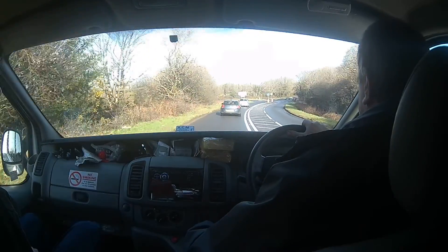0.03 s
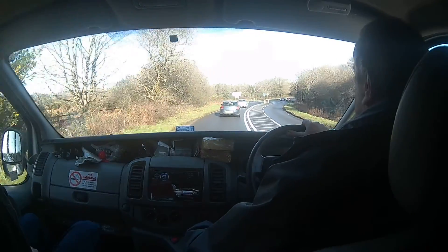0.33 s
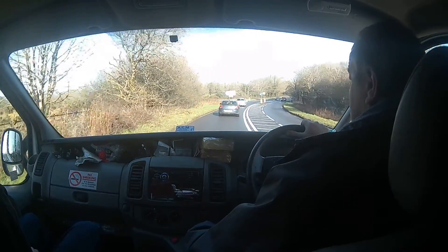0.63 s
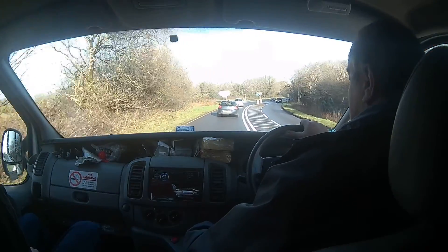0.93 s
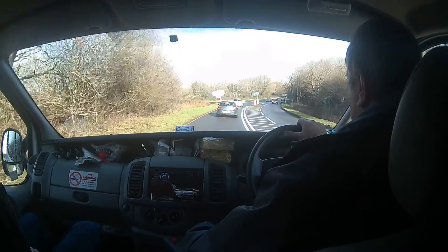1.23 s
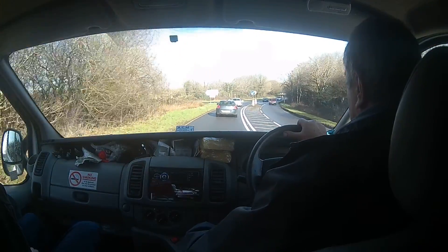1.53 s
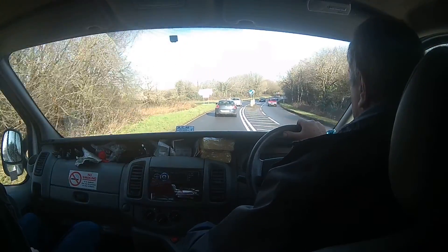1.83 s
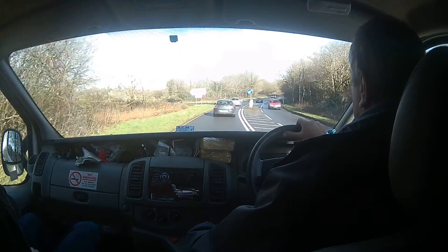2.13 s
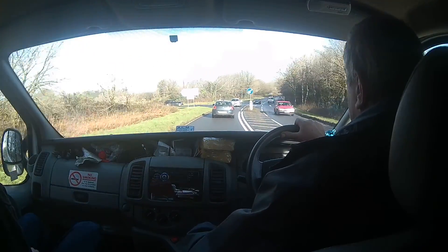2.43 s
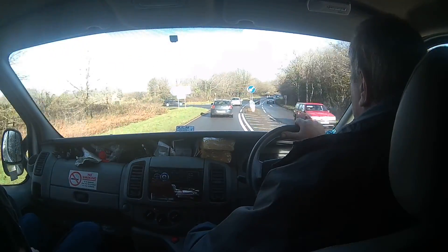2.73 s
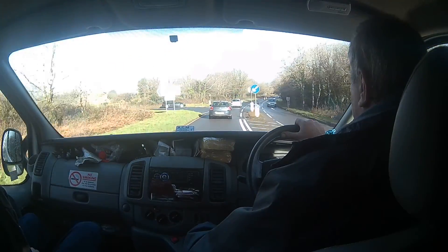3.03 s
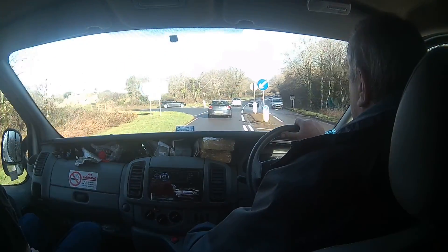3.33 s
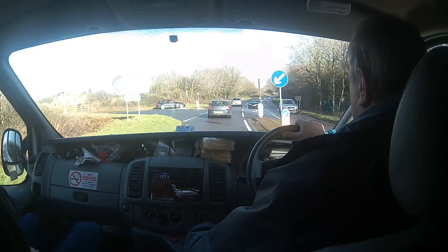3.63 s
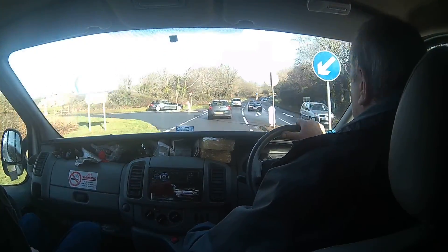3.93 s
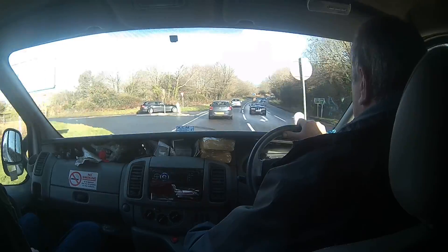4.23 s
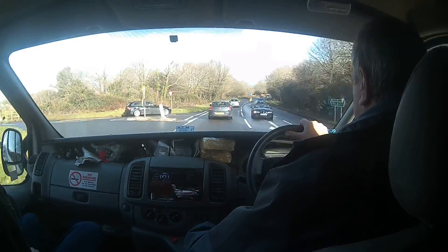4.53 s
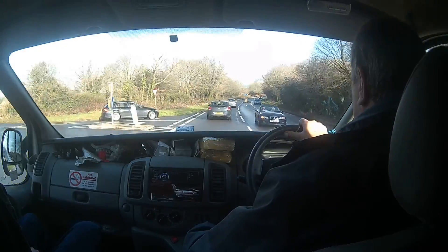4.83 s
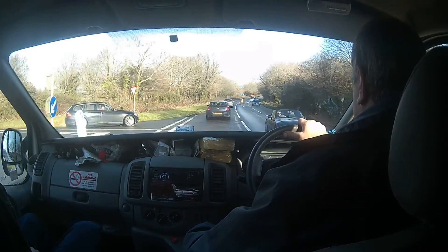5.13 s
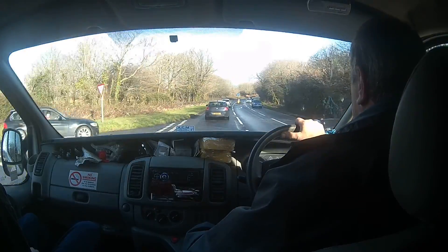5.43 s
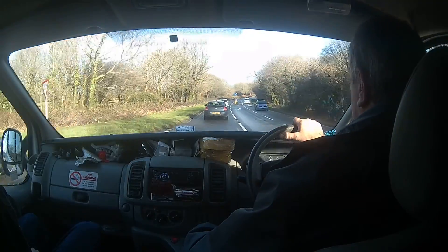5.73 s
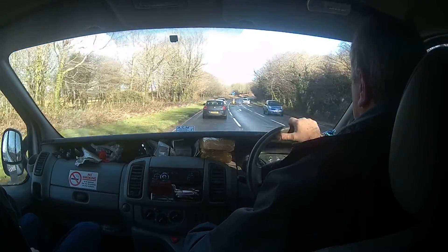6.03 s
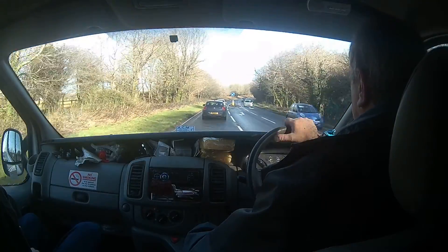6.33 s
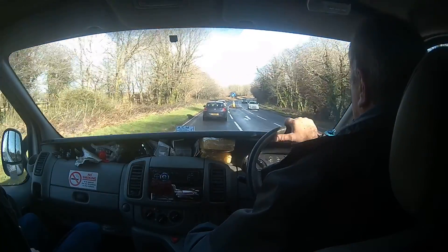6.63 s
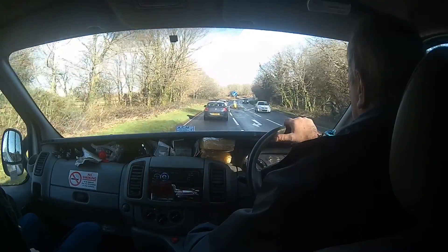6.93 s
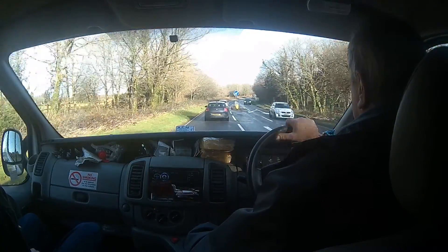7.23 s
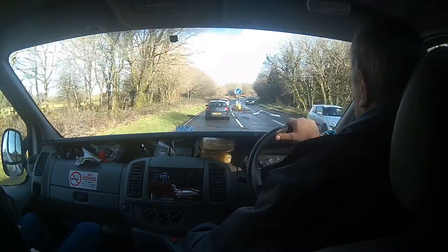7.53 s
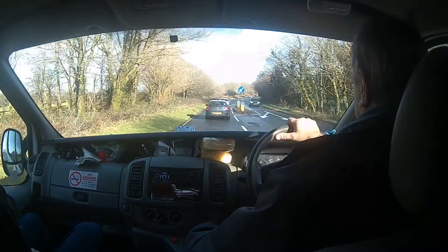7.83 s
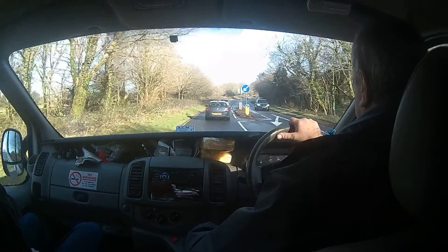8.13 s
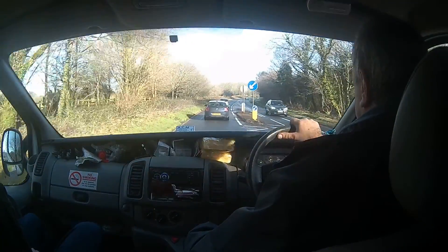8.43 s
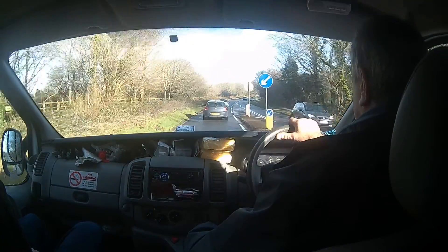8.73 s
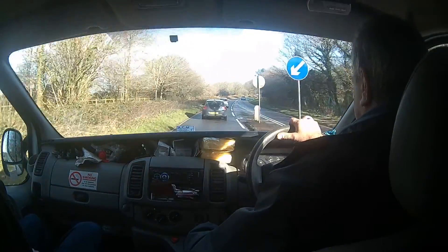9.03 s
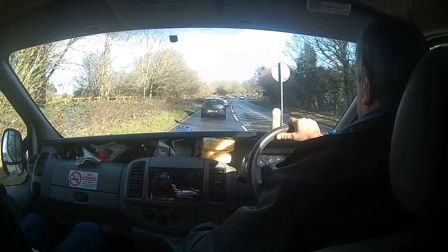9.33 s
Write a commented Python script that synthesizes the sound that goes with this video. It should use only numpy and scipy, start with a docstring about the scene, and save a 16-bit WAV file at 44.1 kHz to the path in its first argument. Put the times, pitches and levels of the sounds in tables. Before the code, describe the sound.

A van drives along a country road, heard from between the seats in the closed cab. From start to end, about nine and a half seconds, tyres roar steadily over a low road boom and a deep engine drone with faint clatter. The engine pitch creeps up very slightly and the floor rumble grows a little. The tyre noise swells briefly on rough asphalt around 1, 4, 6.5 and 7 seconds, and again from 9 seconds. Loose things on the dashboard and plastic trim give short, irregular clacks and knocks throughout, busier around 0.7, 2.5 and 5 seconds. Dull bumps come through the floor at about 1.2 and 3.8 seconds. A soft gear whine swells and fades around 7 seconds. A sharper clack stands out at 8.5 seconds, and the loudest arrives with a thud at 9.4 seconds.

```python
"""Tyre roar and road boom inside the cab of a van slowly gathering speed on a country road.
Tread noise passes through the panels; the road shakes the shell and the cab's lowest air mode.
The engine drones at its firing rate and clatters faintly; a gear whines softly.
Bumps thud in the chassis; plastic trim and loose things on the dashboard rattle."""
import sys
import numpy as np
from scipy import signal
from scipy.fft import rfft, irfft
from scipy.io import wavfile
from scipy.ndimage import uniform_filter1d

SR = 44100
rng = np.random.default_rng(int(sys.argv[2]) if len(sys.argv) > 2 else 0)


def materialize(psi):
    """Save the field psi as 16-bit PCM at rate SR to the path in sys.argv[1].

    A 1-D psi becomes a single channel; in a 2-D psi each row is a channel.
    """
    bounded = np.clip(np.atleast_2d(psi).T, -1, 1)
    quanta = np.round(bounded * 32767).astype(np.int16)
    wavfile.write(sys.argv[1], SR, quanta)


N = 422919
TIME_S = np.arange(N) / SR

# spectral shapes (frequency [Hz], relative level [dB])
TYRE_SPECTRUM = [(150, -32.5), (330, -5.5), (420, -2), (650, -3), (1150, 1), (1600, -1.5), (2100, -1.5),
                 (2850, -5.5), (3150, -14.5), (3550, -22), (4300, -29), (5200, -37.5), (5800, -60),
                 (8000, -83.5)]  # tread noise
PATCH_SPECTRUM = [(150, -21), (400, -2), (600, -3), (850, -10.5), (1100, 6.5), (1300, -1), (1700, -8),
                  (2800, -14), (3600, -36.5), (6000, -73.5)]  # tread on coarse asphalt
BOOM_SPECTRUM = [(8, -44.5), (13, -22), (22, -7.5), (35, -15.5), (50, -9), (62, -2.5), (72, 3.5), (84, -2),
                 (100, -14.5), (130, -26), (300, -75.5)]  # cab air
RUMBLE_SPECTRUM = [(80, -19.5), (130, -12), (180, -4.5), (235, 0.5), (290, -8.5), (400, -10), (550, -9),
                   (1000, -37.5), (3000, -61.5)]  # floor panels
KNOCK_SPECTRUM = [(100, -35.5), (210, -5.5), (320, -4.5), (450, -1.5), (900, 2.5), (1150, -7), (1700, -14),
                  (3000, -37), (6000, -84)]  # trim panel
CLACK_SPECTRUM = [(200, -49.5), (900, -3.5), (1400, -1.5), (1900, 4.5), (2600, -4), (3100, -16.5),
                  (3700, -32.5), (5200, -41), (6000, -61)]  # hard contact
TICK_SPECTRUM = [(500, -36.5), (2000, -13), (2800, 14), (3300, 10), (3700, -9), (4400, -8), (5300, -25),
                 (5900, -48), (12000, -45.5), (15000, -61.5)]  # edge of a loose part
THUD_SPECTRUM = [(50, -8), (140, -20), (205, -2), (250, 0.5), (330, -13.5), (430, 0.5), (700, -24.5),
                 (3000, -72)]  # floor on a bump
HISS_SPECTRUM = [(3000, -13), (6000, -21.5), (6900, -9.5), (8000, -27), (9000, -8), (10200, -2),
                 (12000, -0.5), (14000, -6), (15700, -7.5)]  # microphone
# cab panel and air resonances (centre [Hz], width [Hz], lift [dB])
CAB_MODES = [(222.2, 53, 4.5), (324.5, 50, -6.5), (463, 27, 3), (506, 36, 6.5), (629, 56, -3),
             (795.7, 46, 7.5), (847.4, 56, 6), (1020, 70, 2), (1245, 43, 0), (1337, 38, 7), (1396, 32, 8.5),
             (1464, 62, 7), (1604, 217, 6), (1800, 80, -4.5), (2149, 64, 5), (2285, 30, -4.5),
             (2350, 71, 4), (2730, 55, -5.5), (2800, 210, 4.5), (3280, 120, 0.5), (3730, 190, -2),
             (3860, 110, 2.5), (4340, 130, 2.5), (4630, 120, 0), (5470, 150, 3)]
# coarse asphalt (centre time [s], length [s], level [dB])
COARSE_PATCHES = [(1.13, 0.42, -55.5), (2.613, 0.11, -59.5), (3.85, 0.65, -58), (6.514, 0.27, -55),
                  (7.19, 0.26, -55.5), (9.09, 0.37, -57), (9.5, 0.35, -53.5)]
# engine speed (time [s], firing rate [Hz])
FIRING_RATE = [(0, 69.4), (1.8, 69.43), (3.2, 70.96), (4.2, 70.1), (6.0, 70.82), (7.2, 72.37),
               (9.59, 73.98)]
# low drone (time [s], firing line level [dB], road boom level [dB])
DRONE_LEVELS = [(0, -61, -56.5), (1.2, -59, -56), (1.7, -66, -58.5), (2.7, -59, -55.5), (4.0, -58, -53),
                (5.1, -63.5, -54.5), (5.7, -66, -53.5), (6.5, -61, -56), (7.3, -56.5, -56),
                (7.8, -67, -56.5), (8.6, -60.5, -56.5), (9.59, -58, -52.5)]
# upper engine lines (multiple of firing rate, level [dB])
OVERTONES = [(2, -81), (2.5, -77), (3, -76), (4, -81)]
# loose trim panel (time [s], knock level [dB], clack re knock [dB])
TRIM_KNOCKS = [(.216, -46.5, -6.5), (.305, -52, -9), (.6554, -45, -9), (0.7893, -43.5, -3.5),
               (2.305, -49, -12), (2.493, -51, -11), (2.5631, -50, 0), (2.586, -44.5, -8),
               (3.918, -47, -18), (4.08, -47, -7), (4.353, -49.5, -1.5), (4.784, -51.5, -15),
               (4.875, -43, -10), (4.959, -51, -8), (5.1402, -45.5, -6), (5.235, -44.5, -10),
               (6.564, -46, -5), (6.941, -47, -8), (7.1515, -45.5, 0.5), (7.833, -48.5, -8),
               (7.881, -47, -18), (9.5152, -47.5, -2.5)]
# things on the dashboard (time [s], clack level [dB], tick re clack [dB])
DASH_CLACKS = [(0.5964, -43.5, -6), (0.7584, -47, -6), (1.1054, -51, -8), (1.4925, -53, -9),
               (1.6259, -49.5, -10), (1.6842, -56.5, -1.5), (2.075, -51.5, -15), (2.3572, -51.5, -2.5),
               (2.574, -50.5, -14), (2.8559, -49, -8.5), (3.0918, -53, -24), (3.3139, -52.5, -24),
               (3.4945, -50, -3), (3.8252, -45, -12.5), (4.5485, -43.5, -5.5), (4.7181, -50, -11),
               (4.8548, -42, -12), (5.3709, -46, -18), (5.4005, -50, -5), (5.7139, -44, -8.5),
               (6.1651, -46.5, -5), (6.2792, -49.5, -8), (6.6927, -50.5, -18), (6.9562, -45, -16),
               (7.009, -48, -10), (7.6648, -43.5, -25), (7.84, -47, -5.5), (7.9218, -45.5, -24),
               (8.135, -47.5, -7), (8.159, -50.5, -18), (8.4776, -37.5, -20), (8.9126, -46, -8.5),
               (9.396, -34, -12.5)]
# dashboard plastic (frequency [Hz], relative level [dB], t60 [s])
PLASTIC_MODES = [(1394, 2.5, 0.08), (1630, -6.5, 0.034), (2460, 2.5, 0.063), (2490, 2.5, 0.086),
                 (2745, -7.5, .05), (3210, -13.5, 0.032), (3730, -22.5, 0.065), (4400, -15, 0.034),
                 (5360, -33, 0.038)]
# road bumps (time [s], level [dB])
ROAD_BUMPS = [(1.191, -49.5), (2.586, -53), (3.824, -41.5), (3.86, -48), (4.876, -51), (5.237, -55),
              (9.396, -39)]
# microphone electronics (frequency [Hz], level [dB])
WHINE_LINES = [(10718, -111), (13722, -97)]


def tyres(gained_hz, coarse, base_db=-54.5, db_per_hz=.14, sway_db=.68, flicker_db=.4):
    """Tread noise through the panels; flickers with the asphalt grain, swells on coarse patches."""
    roar = noise(TYRE_SPECTRUM, CAB_MODES) * undb(base_db + db_per_hz * gained_hz + sway_db * walk(4))
    patches = coarse * noise(PATCH_SPECTRUM, CAB_MODES)
    return (roar + patches) * undb(flicker_db * walk(25))


def body(boom_db, gained_hz, coarse, rumble_db=-63.5, db_per_hz=.68, sway_db=1.6, coarse_gain_db=-4):
    """Road-shaken shell: the lowest air mode booms; floor rumble grows with speed and coarse asphalt."""
    boom = noise(BOOM_SPECTRUM)
    boom = unit(boom / uniform_filter1d(boom ** 2, size=6000) ** .25)  # halves the swings in dB
    shake = undb(rumble_db + db_per_hz * gained_hz + sway_db * walk(5))
    shake = np.hypot(shake, undb(coarse_gain_db) * coarse)
    return boom * undb(boom_db) + noise(RUMBLE_SPECTRUM, CAB_MODES) * shake


def engine(firing_hz, firing_db, wander=.003, flutter_db=1.5, clatter_db=-64):
    """Firing line and weak overtones, locked to the crank; injectors and valves clatter twice a firing."""
    cycles = np.cumsum(firing_hz * (1 + wander * walk(3))) / SR
    drone = 0
    for multiple, db in [(1, firing_db), *OVERTONES]:
        amplitude = np.sqrt(2) * undb(db + flutter_db * walk(6))
        drone += amplitude * np.sin(2 * np.pi * (multiple * cycles + rng.random()))
    bursts = np.exp(-(2 * cycles % 1) / .4) * rng.standard_normal(N)
    clatter = unit(ring(bursts, response(TYRE_SPECTRUM, CAB_MODES)))
    return drone + undb(clatter_db) * clatter


def rattles(tick_re_knock_db=-25, knock_re_clack_db=-7.5, ring_re_tick_db=2):
    """Each loose part knocks its panel, clacks, ticks at its edge and rings the plastic."""
    out = np.zeros(N)
    knock, clack, tick = (response(s, CAB_MODES) for s in (KNOCK_SPECTRUM, CLACK_SPECTRUM, TICK_SPECTRUM))
    soft = [(s, db, db + contact_db, db + tick_re_knock_db) for s, db, contact_db in TRIM_KNOCKS]
    hard = [(s, db + knock_re_clack_db, db, db + edge_db) for s, db, edge_db in DASH_CLACKS]
    for at_s, knock_db, clack_db, tick_db in soft + hard:
        add(out, at_s, knock_db, strike(knock, hold_s=.003, t60_s=.031, echo_db=-20, echo_t60_s=.15))
        add(out, at_s, clack_db, strike(clack, hold_s=.0051, t60_s=.023, echo_db=-18.5, echo_t60_s=.07))
        add(out, at_s, tick_db, strike(tick, hold_s=.0046, t60_s=.017, echo_db=-20, echo_t60_s=.063))
        add(out, at_s, tick_db + ring_re_tick_db, plastic_ring())
    return out


def plastic_ring(detune=.0082, attack_s=.001):
    """Decaying plastic modes, slightly detuned on each blow."""
    t = np.arange(6000) / SR
    hz, db, t60_s = np.transpose(PLASTIC_MODES)[:, :, None]
    shift, phase = rng.random((2, len(PLASTIC_MODES), 1))
    hz = hz * (1 + detune * (2 * shift - 1))
    modes = undb(db - 60 * t / t60_s) * np.sin(2 * np.pi * (hz * t + phase))
    onset = 1 - np.exp(-(t / attack_s) ** 2)
    return unit_hit(modes.sum(axis=0) * onset)


def bumps():
    """The suspension passes each bump to the floor as a dull thud."""
    out, floor = np.zeros(N), response(THUD_SPECTRUM, CAB_MODES)
    for at_s, db in ROAD_BUMPS:
        add(out, at_s, db, strike(floor, hold_s=.016, t60_s=.075, echo_db=-32, echo_t60_s=.25))
    return out


def gear(firing_hz, ratio=7, wander=.004, flutter_db=2.5, rest_db=-78, swell_db=-66, sideband_db=-7):
    """Gear mesh in step with the engine, plus a sideband one crank rate above; swells once."""
    cycles = np.cumsum(firing_hz * (1 + wander * walk(18))) / SR
    mesh = np.sin(2 * np.pi * ratio * cycles)
    sideband = undb(sideband_db) * np.sin(2 * np.pi * (ratio + .5) * cycles)
    level = np.hypot(undb(rest_db), undb(swell_db) * swell(peak_s=6.76, length_s=2.9))
    return np.sqrt(2) * level * undb(flutter_db * walk(13)) * (mesh + sideband)


def clutter(clack_db=-55.5, tick_db=-66.5, spread_db=3, count=45):
    """Loose things stir with faint random ticks."""
    out = np.zeros(N)
    contact = undb(clack_db) * response(CLACK_SPECTRUM, CAB_MODES)
    contact += undb(tick_db) * response(TICK_SPECTRUM, CAB_MODES)
    for when, force in rng.random((count, 2)):
        hit = strike(contact, hold_s=.0054, t60_s=.041, echo_db=-21, echo_t60_s=.08)
        add(out, when * TIME_S[-1], spread_db * (2 * force - 1), np.linalg.norm(contact) * hit)
    return out


def trim_stir(knock_db=-55, spread_db=3, count=16):
    """The trim panel knocks faintly at random."""
    out, panel = np.zeros(N), response(KNOCK_SPECTRUM, CAB_MODES)
    for when, force in rng.random((count, 2)):
        hit = strike(panel, hold_s=.0022, t60_s=.031, echo_db=-20.5, echo_t60_s=.15)
        add(out, when * TIME_S[-1], knock_db + spread_db * (2 * force - 1), hit)
    return out


def strike(impulse_response, hold_s, t60_s, echo_db, echo_t60_s, crack=.47):
    """A sharp contact chatters, dies fast and leaves a short cab echo."""
    t = np.arange(8192) / SR
    chatter = undb(-60 * np.maximum(t - hold_s, 0) / t60_s)
    envelope = chatter + undb(echo_db - 60 * t / echo_t60_s)
    force = envelope * rng.standard_normal(len(t)) / np.linalg.norm(envelope)
    force[rng.integers(20, 60)] += crack * rng.choice([-1, 1])  # first contact
    return unit_hit(ring(force, impulse_response))


def response(spectrum, resonances=(), size=16384):
    """Minimum-phase impulse response of a spectrum plus resonances; unit energy."""
    bins_hz = np.arange(size // 2 + 1) * SR / size
    hz, db = np.transpose(spectrum)
    db = np.interp(np.log(bins_hz + 1), np.log(hz), db)
    for centre_hz, width_hz, lift_db in resonances:
        db += lift_db * .5 ** ((2 * (bins_hz - centre_hz) / width_hz) ** 2)
    cepstrum = irfft(np.log(undb(db)))[:size // 2]
    cepstrum[0] = 0
    impulse_response = irfft(np.exp(rfft(2 * cepstrum, size)))[:size // 2]
    return impulse_response / np.linalg.norm(impulse_response)


def ring(force, impulse_response):
    """Force through an impulse response."""
    return signal.fftconvolve(force, impulse_response)[:len(force)]


def noise(spectrum, resonances=()):
    """Shaped noise; rms 1."""
    impulse_response = response(spectrum, resonances)
    white = rng.standard_normal(N + len(impulse_response) - 1)
    return signal.fftconvolve(white, impulse_response, "valid")


def walk(rate_hz):
    """Random steps, smoothed twice; spread near 1."""
    hold = int(SR / rate_hz)
    steps = np.repeat(rng.standard_normal(N // hold + 1), hold)
    return 1.3 * uniform_filter1d(uniform_filter1d(steps, hold), hold)[:N]


def swell(peak_s, length_s):
    """Bell curve; length_s wide at half height."""
    return .5 ** ((2 * (TIME_S - peak_s) / length_s) ** 2)


def curves(table):
    """Table columns as curves over time."""
    times_s, *columns = np.transpose(table)
    return [np.interp(TIME_S, times_s, column) for column in columns]


def add(out, at_s, gain_db, sound):
    """Mix a sound into out."""
    start = int(at_s * SR)
    out[start:start + len(sound)] += undb(gain_db) * sound[:N - start]


def undb(db):
    """Decibels to gain."""
    return 10 ** (np.asarray(db) / 20)


def unit(x):
    """Scale to rms 1."""
    return x / np.sqrt(np.mean(x ** 2))


def unit_hit(hit):
    """Scale to the energy of 10 ms at rms 1."""
    return hit / np.sqrt(np.sum(hit ** 2) / (SR / 100))


def scene():
    """Mono mix between the seats."""
    firing_hz, = curves(FIRING_RATE)
    firing_db, boom_db = curves(DRONE_LEVELS)
    gained_hz = firing_hz - firing_hz[0]
    coarse = sum(undb(db) * swell(at_s, length_s) for at_s, length_s, db in COARSE_PATCHES)
    drive = engine(firing_hz, firing_db) + gear(firing_hz)
    road = body(boom_db, gained_hz, coarse) + tyres(gained_hz, coarse) + bumps()
    return (drive + road + rattles() + clutter() + trim_stir())[None]


def record(dry, hiss_db=-90, cutoff_hz=15700):
    """Microphone hiss and thin whine, then a low-pass."""
    whine = sum(undb(db) * np.sqrt(2) * np.sin(2 * np.pi * hz * TIME_S) for hz, db in WHINE_LINES)
    wet = dry + undb(hiss_db) * noise(HISS_SPECTRUM) + whine
    return signal.sosfilt(signal.ellip(10, .2, 70, cutoff_hz, fs=SR, output="sos"), wet)


dry = scene()
out = record(dry)
materialize(out)
```